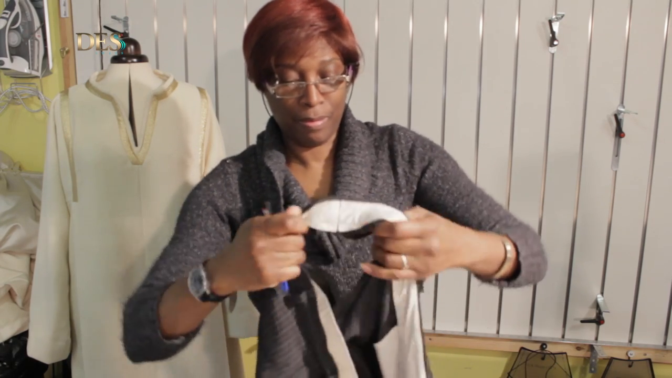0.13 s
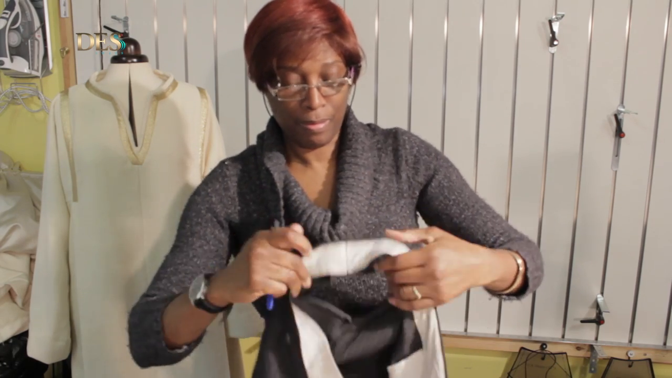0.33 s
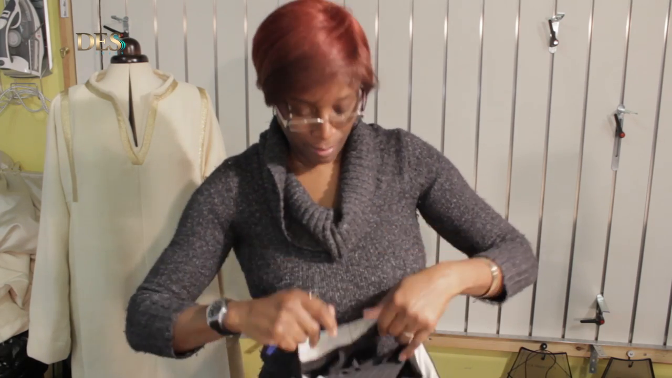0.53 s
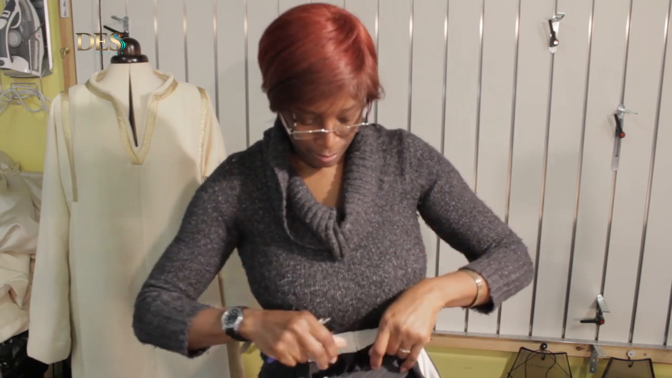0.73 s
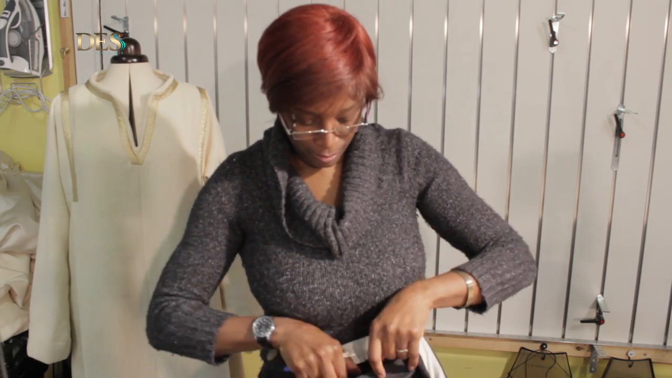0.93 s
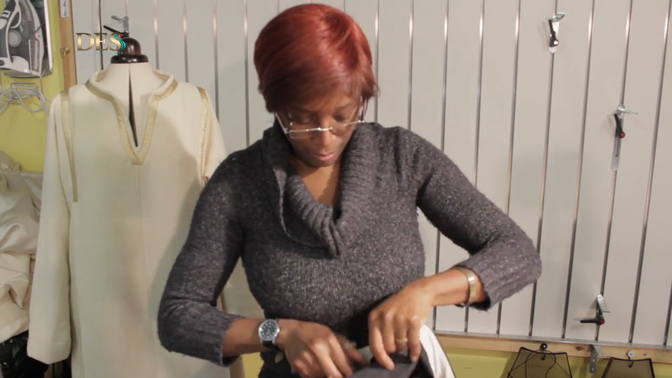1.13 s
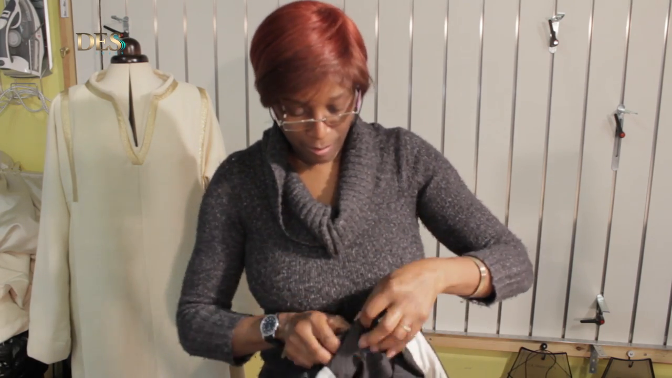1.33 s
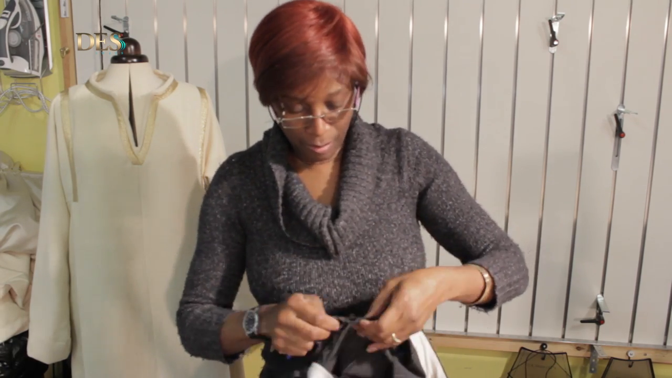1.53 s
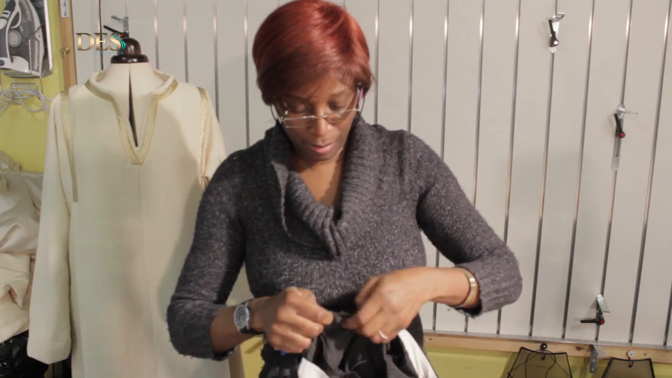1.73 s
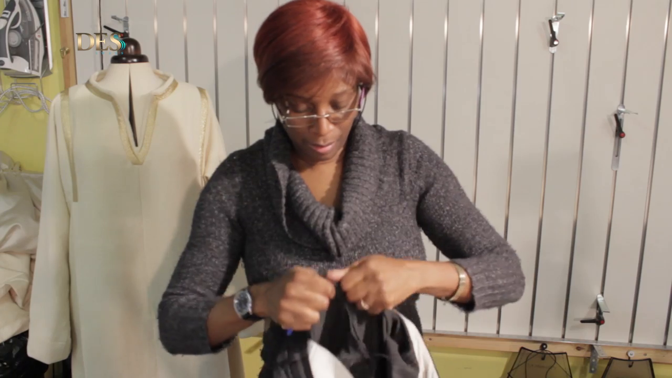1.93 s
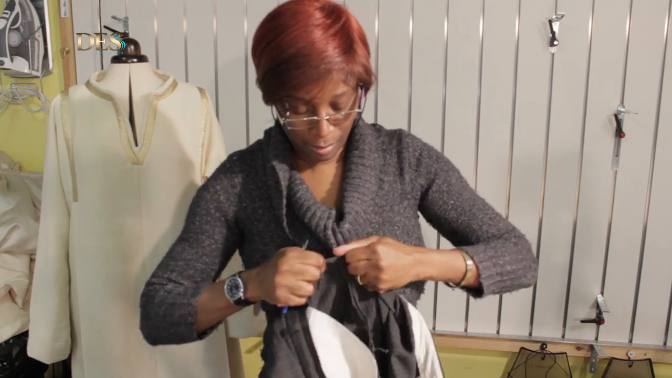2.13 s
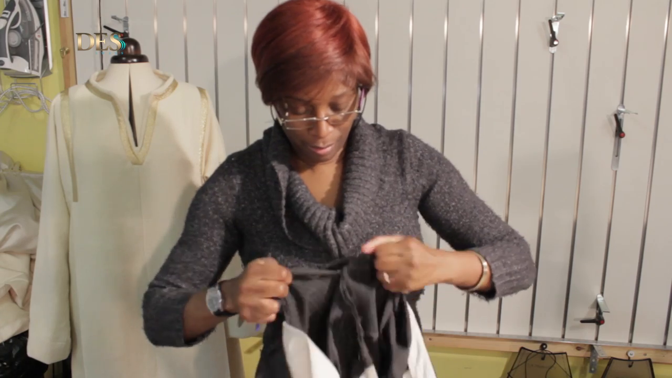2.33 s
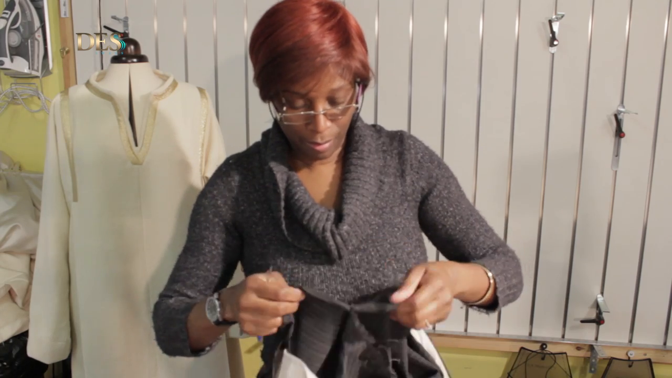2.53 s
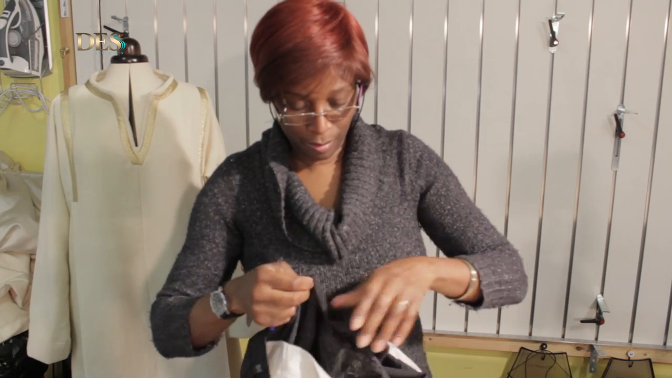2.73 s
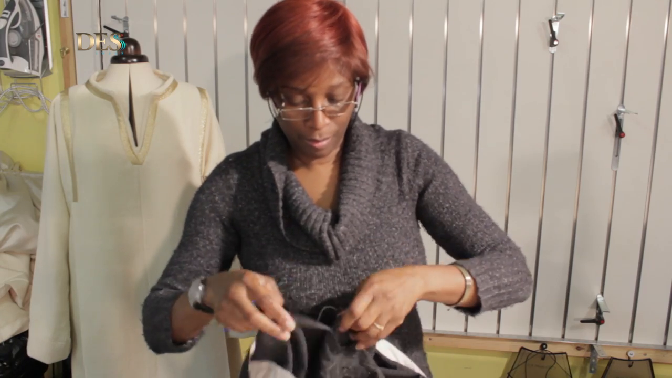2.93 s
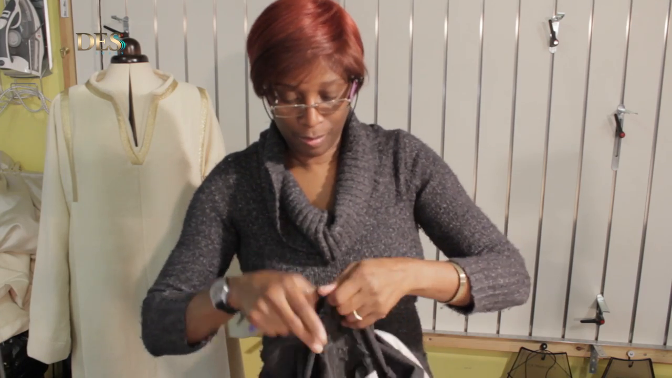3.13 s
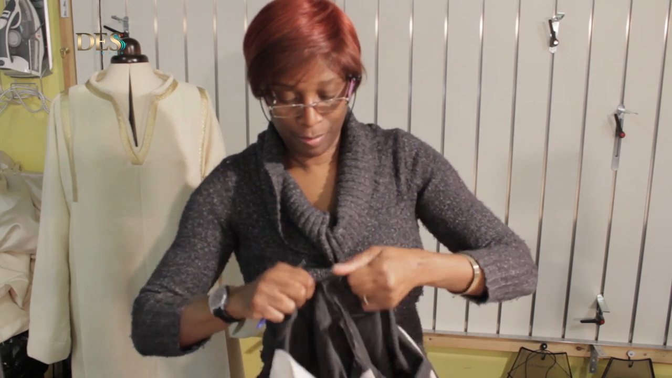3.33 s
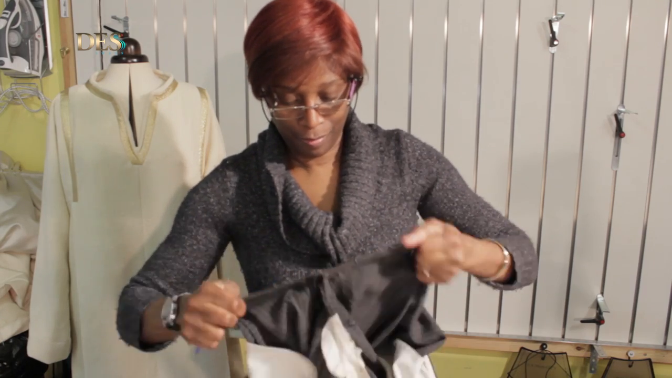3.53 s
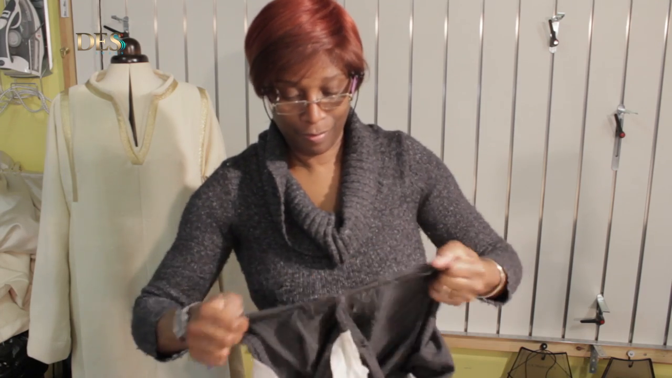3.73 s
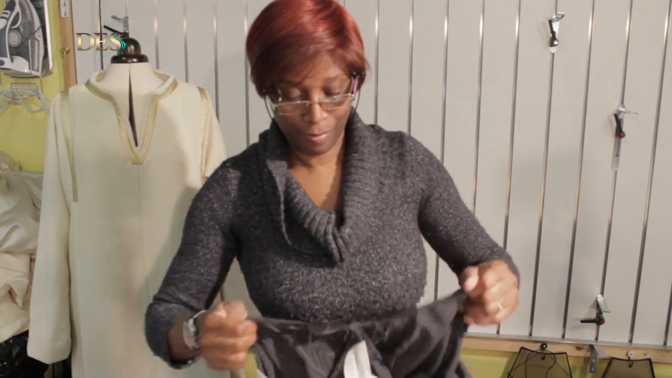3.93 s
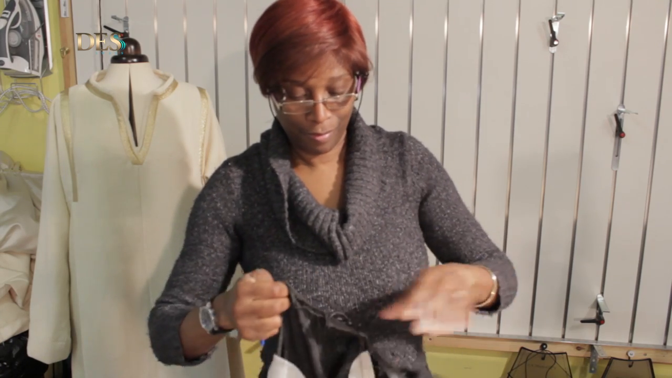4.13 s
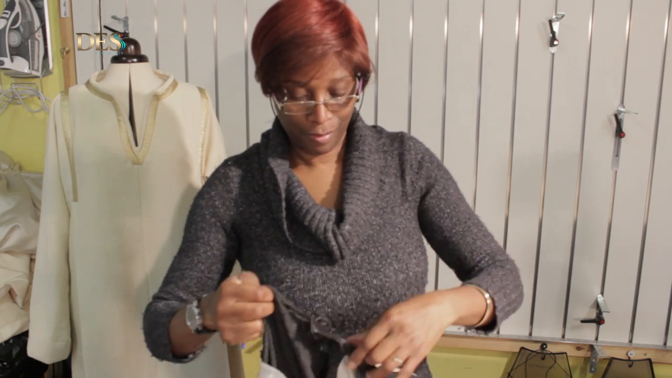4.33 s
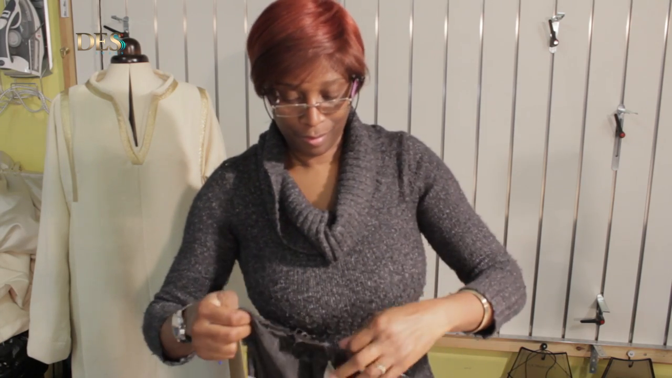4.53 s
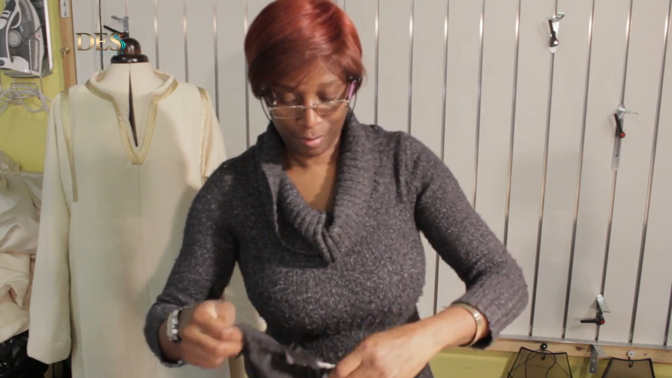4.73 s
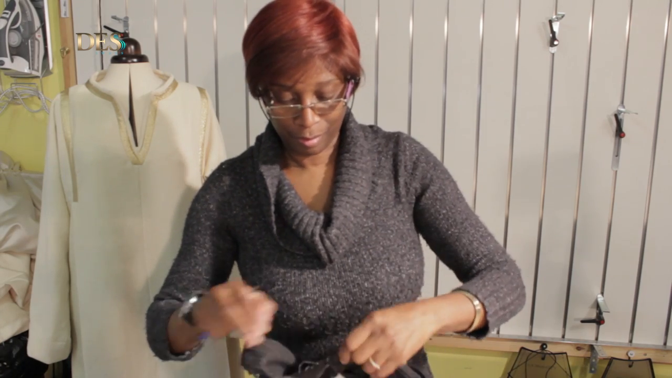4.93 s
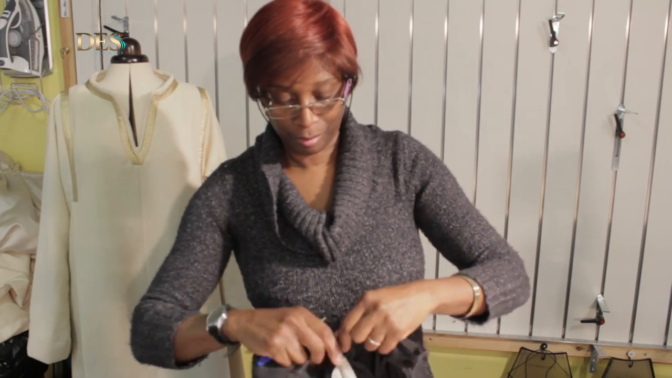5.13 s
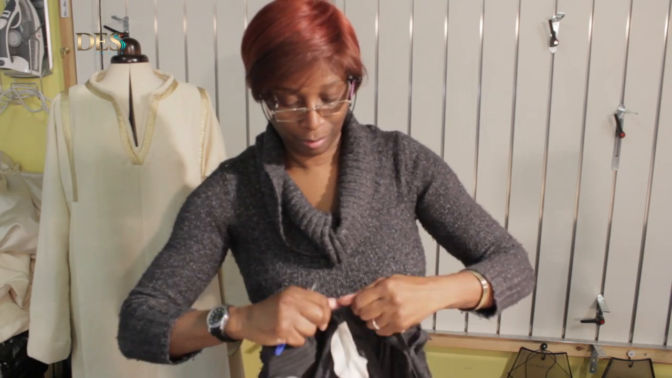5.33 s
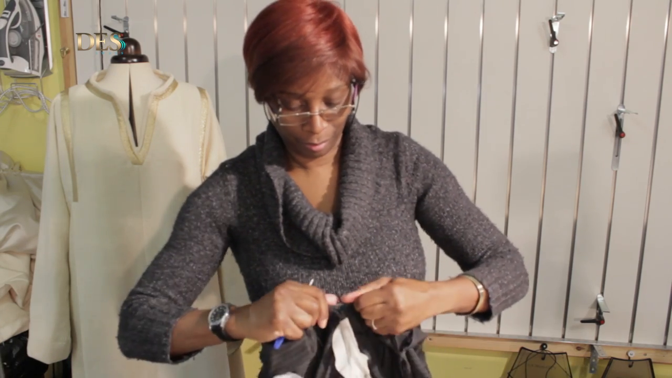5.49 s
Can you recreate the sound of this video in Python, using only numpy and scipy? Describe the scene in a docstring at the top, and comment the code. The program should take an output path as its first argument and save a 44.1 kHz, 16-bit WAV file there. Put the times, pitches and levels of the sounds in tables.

```python
"""Stitches snap one after another as a seam is pulled apart by hand, in a few tugs, in a small room.
Each thread fails under tension: a sharp crack, a spray of parting fibres, a flap of the released cloth.
Loose thread rasps by stick-slip friction; fabric rustles, sleeves rub and the swung garment billows.
The room reflects these sounds over its own air noise, a low hum and microphone hiss.
A limiter ducks at the hardest snaps."""
import sys
import numpy as np
from scipy import signal
from scipy.fft import rfft, irfft, next_fast_len
from scipy.io import wavfile
from scipy.ndimage import uniform_filter1d, minimum_filter1d

SR = 44100
rng = np.random.default_rng(int(sys.argv[2]) if len(sys.argv) > 2 else 0)


def to_wav(s):
    """Save 16-bit WAV."""
    ch = np.atleast_2d(s).T  # columns
    pcm = np.round(np.clip(ch, -1, 1) * 32767)  # PCM
    wavfile.write(sys.argv[1], SR, pcm.astype(np.int16))


N = 245220
T = np.arange(N) / SR


def undb(db):
    """Decibels to amplitude ratio."""
    return 10 ** (np.asarray(db) / 20)


def unit(x):
    """Normalisation to rms 1."""
    return x / np.sqrt(np.mean(x ** 2))


def colour(x, points):
    """Zero-phase filtering by a spectrum of (Hz, dB) points."""
    hz, db = np.transpose(points)
    n = x.shape[-1]
    size = next_fast_len(2 * n)
    f = np.maximum(np.arange(size // 2 + 1) * SR / size, 1)
    gain = undb(np.interp(np.log(f), np.log(hz), db))
    return irfft(rfft(x, size) * gain, size)[..., :n]


def band(x, lo_hz, hi_hz, order=1):
    """Causal band-pass filtering."""
    sos = signal.butter(order, [lo_hz, min(hi_hz, SR / 2 - 1)], "band", fs=SR, output="sos")
    return signal.sosfilt(sos, x)


def add(out, x, start):
    """Superposition of x on out from a time in seconds."""
    i = max(int(round(start * SR)), 0)
    out[i:i + len(x)] += x[:N - i]


def stereo(mid, side):
    """Left and right as mid plus and minus side."""
    return np.array([mid + side, mid - side])


def drift(rate_hz):
    """Smoothed random fluctuation of rms 1."""
    step = int(SR / rate_hz)
    stairs = np.repeat(rng.standard_normal(N // step + 1), step)
    return unit(uniform_filter1d(stairs, step)[:N])


def swell(start, end, attack_s, release_s):
    """An envelope: linear rise from start, hold at 1, exponential decay after end."""
    return np.clip((T - start) / attack_s, 0, 1) * np.exp(-np.maximum(T - end, 0) / release_s)


def swells(rows, rest_db, attack_s, release_s):
    """Envelopes summed on a resting level, each at full strength from its start to its end."""
    return undb(rest_db) + sum(undb(db) * swell(start - attack_s, end, attack_s, release_s)
                               for start, end, db in rows)


# Modes of the taut cloth. Each row: frequency in Hz, bandwidth in Hz, gain in dB.
CLOTH_MODES = [(230, 74, -2), (400, 175, -0.5), (670, 110, 6), (1010, 480, -1.5), (1850, 780, 0.5),
               (2960, 980, 0), (6870, 2900, -1.5)]

def cloth(x):
    """Resonance: taut fabric responds in a few broad modes of alternating polarity."""
    return sum((-1) ** k * undb(db) * band(x, hz ** 2 / (hz + width / 2), hz + width / 2)
               for k, (hz, width, db) in enumerate(CLOTH_MODES))


# Tugs on the seam. Each row: start and end in seconds, first and last cloth pitch in Hz,
# cycles to the peak of a flap, thread drag level in dB.
SEAM_TUGS = [(-.05, 0.007, 1210, 1210, 0.4, -35.5), (2.269, 2.353, 1030, 645, 0.42, -35),
             (3.494, 3.611, 626, 1470, 0.26, -37), (3.838, 3.89, 1470, 860, .3, -59)]

def thread_drag(slips_per_s=2500, uneven_db=4):
    """Stick-slip friction: thread jerks through the needle holes and excites the cloth's modes."""
    slips = (rng.random(N) < slips_per_s / SR) * rng.choice([-1, 1], N)
    strength = undb(uneven_db * rng.standard_normal(N))
    pull = sum(undb(db) * swell(start, end, attack_s=0.042, release_s=0.023)
               for start, end, *_, db in SEAM_TUGS)
    return unit(cloth(slips * strength)) * pull


def cloth_tuning(when):
    """Pitch follows tension: the cloth's frequency and cycles to peak within the nearest tug."""
    nearest = min(SEAM_TUGS, key=lambda tug: abs(when - (tug[0] + tug[1]) / 2))
    start, end, first_hz, last_hz, cycles, _ = nearest
    progress = np.clip((when - start) / (end - start), 0, 1)
    return first_hz * (last_hz / first_hz) ** progress, cycles


def recoil(t, hz, cycles):
    """Heavily damped oscillation whose envelope peaks after the given number of cycles."""
    age = t * hz / cycles
    return age * np.exp(1 - age) * np.sin(2 * np.pi * hz * t)


def parting_fibres(t, crack_hz, cycles, onset_s=.0003, decay_s=.00044, click_chance=0.23):
    """Less mass rings higher: single fibres break in a brief shower of ticks above the crack's pitch."""
    clicks = rng.standard_normal(len(t)) * (rng.random(len(t)) < click_chance)
    shower = clicks * np.exp(-t / decay_s) * (t > onset_s)
    tick = recoil(t, 1.235 * crack_hz, cycles)
    return unit(signal.fftconvolve(shower, tick)[:len(t)])


# Breaking stitches. Each row: start in seconds, crack level in dB, crack pitch in Hz, flap level in dB.
STITCH_BREAKS = [(.011, -18.5, 6960, -34), (2.2654, -7, 8000, -26), (2.2769, -9, 7160, -23),
                 (2.2934, -17, 8200, -20), (2.3059, -9.5, 8200, -22.5), (2.3180, -20, 6800, -19),
                 (2.3260, -13, 7500, -21.5), (2.3285, -8.5, 7640, -23), (2.3642, -20, 3200, -31.5),
                 (3.4880, -30, 3470, -34), (3.4980, -38, 3500, -36.5), (3.52, -9, 8800, -20.5),
                 (3.5493, -24, 6500, -23), (3.5637, -20.5, 5000, -32), (3.5770, -10, 5960, -21.5),
                 (3.6021, -6.5, 6400, -18.5), (3.6303, 1, 6400, -16), (3.8380, 9.5, 6800, -7),
                 (3.8510, -7, 3200, -25), (3.865, 5, 4730, -11), (3.894, 4.5, 5300, -15.5)]

def stitch_snaps(recoil_peak_s=.000068, crumple_db=-4.5, crumple_s=.0036, flap_delay_s=.0003):
    """Release of elastic energy: a thread cracks, its fibres part, the freed cloth flaps and crumples."""
    out, t = np.zeros(N), T[:SR // 20]
    for start, crack_db, crack_hz, flap_db in STITCH_BREAKS:
        cycles = recoil_peak_s * crack_hz
        crack = recoil(t, crack_hz, cycles)
        fray_db = -4 - 0.19 * crack_db  # weak threads fray, strong ones break clean
        fibres = undb(fray_db) * np.std(crack) * parting_fibres(t, crack_hz, cycles)
        crumple = unit(cloth(rng.standard_normal(len(t)))) * np.exp(-t / crumple_s)
        flap = recoil(t, *cloth_tuning(start)) + undb(crumple_db) * crumple
        add(out, undb(crack_db) * (crack + fibres), start)
        add(out, undb(flap_db) * flap, start + flap_delay_s)
    return band(out, 143, SR / 2, order=2)  # the snaps carry no bass


# Spectrum of the still room. Each row: frequency in Hz, relative spectral density in dB.
AIR_SPECTRUM = [(20, -10.5), (45, 1), (100, -0.5), (165, -4.5), (210, -1.5), (290, -4.5), (340, -8),
                (550, -9.5), (800, -6), (1200, -7.5), (1700, -16.5), (4000, -19), (16000, -38)]

def room_air(level_db=-55.5, side_db=-2.5, flutter_db=1, pan_db=1.5):
    """Ambient noise: a low rush, partly correlated between the channels, flutters and leans left."""
    mid, side = colour(rng.standard_normal((2, N)), AIR_SPECTRUM)
    air = unit(stereo(mid, undb(side_db) * side))
    return air * undb(level_db + flutter_db * drift(rate_hz=9)) * undb([[pan_db], [-pan_db]])


# Spectrum of the microphone hiss. Each row: frequency in Hz, relative spectral density in dB.
HISS_SPECTRUM = [(100, 0), (2300, -0.5), (2950, 5), (3700, -1.5), (5000, 2.5), (5800, 0), (7000, 2),
                 (10000, 0), (16000, -1)]

def microphone_hiss(level_db=-52):
    """Self-noise: a steady hiss, independent in each channel."""
    return undb(level_db) * unit(colour(rng.standard_normal((2, N)), HISS_SPECTRUM))


# Fabric sliding through the fingers. Each row: centre and half-width in seconds, level in dB,
# band frequency in Hz.
FABRIC_SLIDES = [(0.249, 0.031, -56, 5600), (2.518, 0.05, -61, 5000), (3.267, 0.0084, -46, 4200),
                 (4.433, .013, -53, 6012), (4.817, 0.016, -56.5, 3300), (5.041, .03, -60, 6000),
                 (5.287, 0.061, -53, 5750), (5.428, 0.072, -58.5, 3700)]

def rustles(grain_db=4):
    """Friction noise: woven threads tick over each other in dense, bell-shaped swells."""
    out = np.zeros(N)
    for centre, half, db, hz in FABRIC_SLIDES:
        t = np.arange(-3 * half, 3 * half, 1 / SR)
        grains = rng.standard_normal(len(t)) * undb(grain_db * rng.standard_normal(len(t)))
        rustle = unit(band(grains, hz / 2, hz * 1.52))
        add(out, undb(db) * rustle * np.exp(-(t / half) ** 2), centre + t[0])
    return out


# Arm movements. Each row: start and end in seconds, level in dB.
SLEEVE_STROKES = [(.38, 1.08, -64), (2.44, 2.52, -68), (2.97, 3.33, -64.5), (4.18, 4.34, -66.5)]

def sleeves():
    """Sliding friction: heavy wool rubs the garment with a low, narrow band of noise."""
    motion = swells(SLEEVE_STROKES, rest_db=-73, attack_s=0.14, release_s=0.029)
    return unit(band(rng.standard_normal(N), lo_hz=268.6, hi_hz=307, order=2)) * motion


# Swells of the hum. Each row: start and end in seconds, relative level in dB.
HUM_RISES = [(1.42, 1.76, -64), (2.42, 2.55, -56), (3.1, 3.4, -55.5), (3.92, 4.22, -59.5)]

def low_hum(hz=64.9, waver_hz=3, gain_db=-1.5):
    """Frequency and amplitude modulation: a low tone wavers at random and swells now and then."""
    phase = 2 * np.pi * np.cumsum(hz + waver_hz * drift(rate_hz=24)) / SR
    envelope = swells(HUM_RISES, rest_db=-67, attack_s=0.11, release_s=0.055)
    return undb(gain_db) * unit(np.sin(phase)) * envelope


# Swings of the garment. Each row: start and length in seconds, level in dB, frequency in Hz.
GARMENT_SWINGS = [(3.538, 0.1, -47, 66), (3.729, .128, -42, 71)]

def billows():
    """Volume displacement: the garment, swung taut, pushes a few slow cycles of air."""
    out = np.zeros(N)
    for start, length, db, hz in GARMENT_SWINGS:
        t = T[:int(length * SR)]
        add(out, undb(db) * signal.windows.tukey(len(t), .35) * np.sin(2 * np.pi * hz * t), start)
    return out


# Width of the diffuse field. Each row: frequency in Hz, side level relative to mid in dB.
FIELD_WIDTH = [(60, -2), (300, -23), (1000, 0), (2500, 4), (6000, 2), (15000, 9)]
# Reverberation bands. Each row: frequency in Hz, level re direct sound in dB, 60 dB decay in seconds.
REVERB_BANDS = [(100, -9, .22), (300, 1.5, .19), (600, -1.5, .16), (1100, 0, .165), (2800, -.5, .155),
                (4500, -5, .15), (8000, -7.5, .155), (15000, -7, .16)]

def diffuse_tail(t, onset_s=0.0006):
    """Reverberation: dense reflections merge into noise that decays exponentially in each band."""
    field = stereo(rng.standard_normal(len(t)), colour(rng.standard_normal(len(t)), FIELD_WIDTH))
    equal_power = [(f, -10 * np.log10(1 + undb(side) ** 2)) for f, side in FIELD_WIDTH]
    spectrum = rfft(colour(field, equal_power))
    log_f = np.log(np.maximum(np.fft.rfftfreq(len(t), 1 / SR), 1))
    hz, db, t60 = np.transpose(REVERB_BANDS)
    tail = np.zeros_like(field)
    for k, share in enumerate(np.eye(len(hz))):
        fade = np.exp(-np.log(1000) * t / t60[k]) * (1 - np.exp(-t / onset_s))
        band_noise = irfft(spectrum * np.interp(log_f, np.log(hz), share), len(t))
        tail += undb(db[k]) * band_noise * fade / np.linalg.norm(fade)
    return tail


# Reflections from near surfaces. Each row: delay in seconds, gain in dB.
EARLY_REFLECTIONS = [(.00122, -14), (.00355, -12), (.0087, -23.5)]
# Modes of metal things in the room. Each row: frequency in Hz, gain in dB, 60 dB decay in seconds.
METAL_MODES = [(1175, -64.5, .6), (4138, -64.5, .28), (4172, -63, .28)]

def room(x):
    """Convolution with the room's response: direct sound, echoes, tail and sympathetic metal rings."""
    t = T[:SR * 3 // 4]
    response = diffuse_tail(t)
    response[:, 0] += 1  # direct sound
    for delay, db in EARLY_REFLECTIONS:
        response[:, int(delay * SR)] += undb(db)
    for hz, db, t60 in METAL_MODES:
        response += undb(db) * np.sin(2 * np.pi * hz * t) * np.exp(-np.log(1000) * t / t60)
    return signal.fftconvolve(x[None], response, axes=1)[:, :N]


# Response of the right microphone port. Each row: frequency in Hz, gain relative to the left in dB.
RIGHT_RESPONSE = [(100, -4), (700, -2.5), (4400, 0.5), (7500, -3), (9500, -1.5), (11300, -7), (15000, -2)]

def microphone_ports(x, lag_s=.000019):
    """Time and level cues: sound reaches the right port slightly later and duller."""
    left, right = x
    phase_lag = np.exp(-2j * np.pi * np.fft.rfftfreq(N, 1 / SR) * lag_s)
    late = irfft(rfft(right) * phase_lag, N)
    return np.array([left, colour(late, RIGHT_RESPONSE)])


def scene():
    """Superposition: the hands' work in the room adds to air noise, hum and hiss."""
    seam = stitch_snaps() + thread_drag() + rustles()
    hands = room(seam) + sleeves() + billows()
    return microphone_ports(hands) + room_air() + low_hum() + microphone_hiss()


def limiter(x, ceiling_db=1.5, hold_s=0.19, release_db_per_s=38):
    """Look-ahead limiting: the gain drops just before an overload, holds, then climbs back steadily."""
    peak_db = 20 * np.log10(np.abs(x).max(axis=0) + 1e-9)
    need_db = np.minimum(0, ceiling_db - peak_db)
    half = int(hold_s * SR / 2)
    held_db = minimum_filter1d(need_db, 2 * half + 1, origin=half)
    climb_db = release_db_per_s * T
    gain_db = np.minimum.accumulate(held_db - climb_db) + climb_db
    smooth_db = uniform_filter1d(minimum_filter1d(gain_db, size=65), size=65)
    return x * undb(smooth_db)


def record(dry, cutoff_hz=15900):
    """Finite headroom and bandwidth: peaks are limited, clipped at full scale and low-pass filtered."""
    low_pass = signal.ellip(10, .1, 70, cutoff_hz, fs=SR, output="sos")
    return signal.sosfilt(low_pass, np.clip(limiter(dry), -1, 1))


dry = scene()
out = record(dry)
to_wav(out)
```